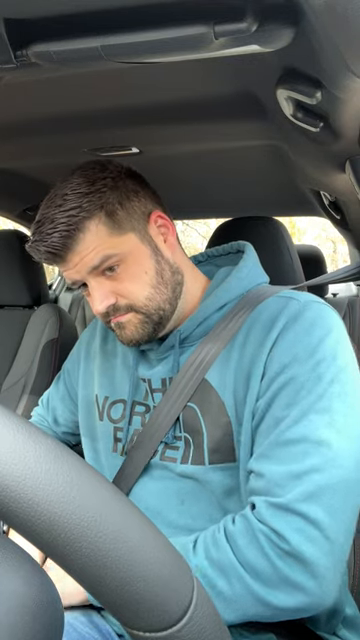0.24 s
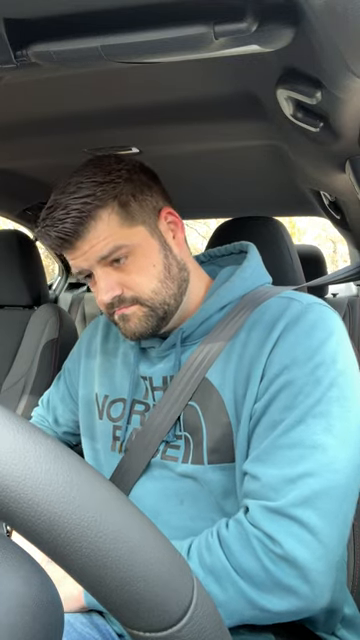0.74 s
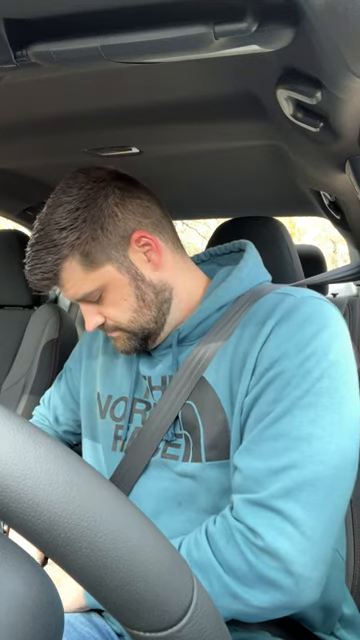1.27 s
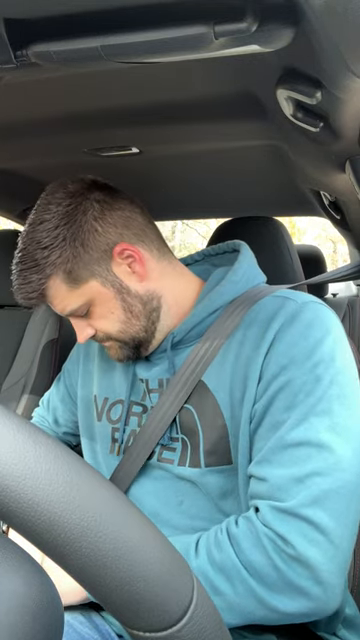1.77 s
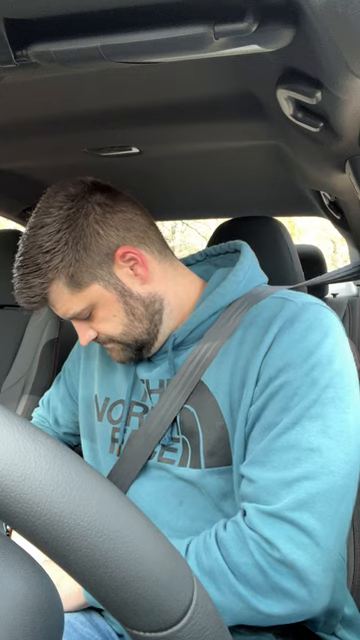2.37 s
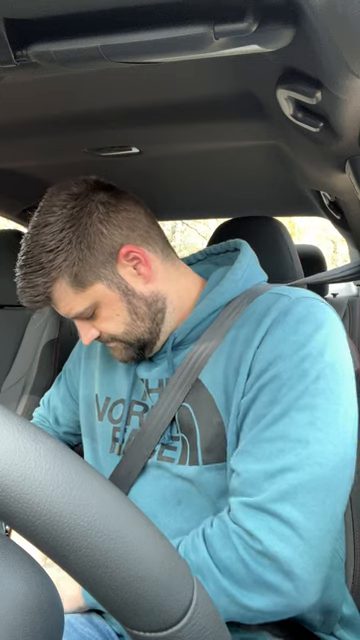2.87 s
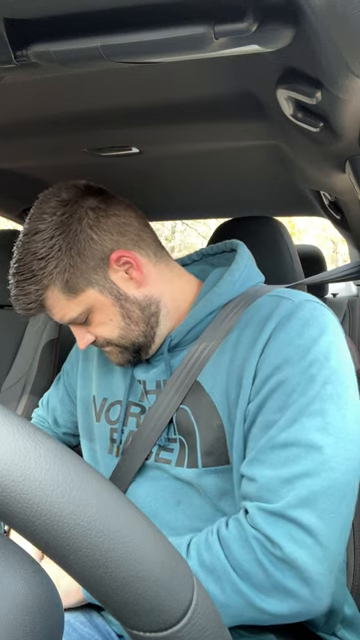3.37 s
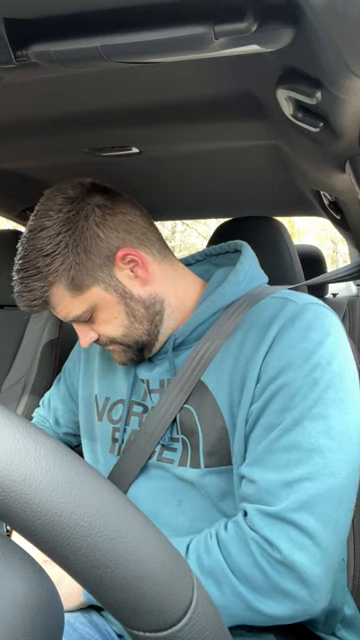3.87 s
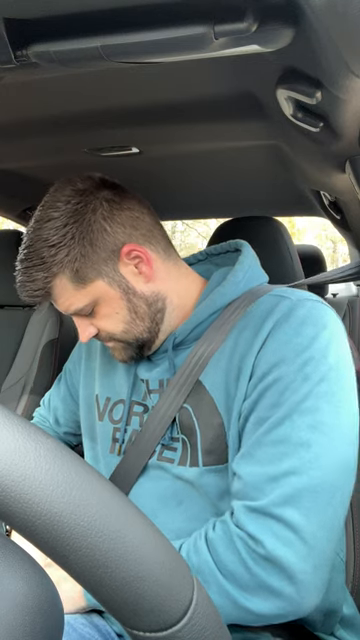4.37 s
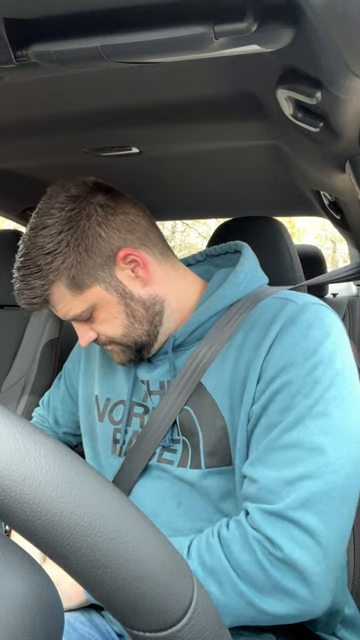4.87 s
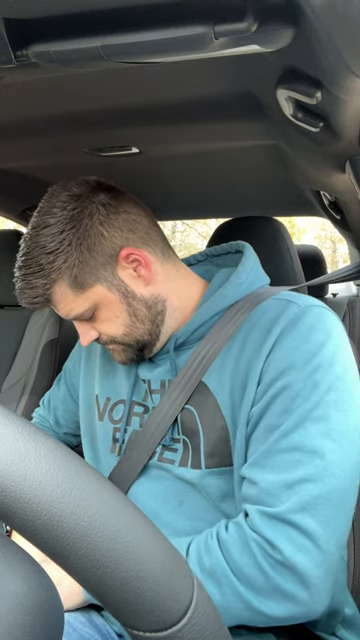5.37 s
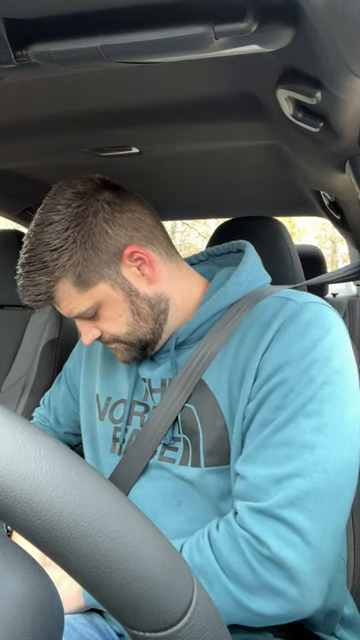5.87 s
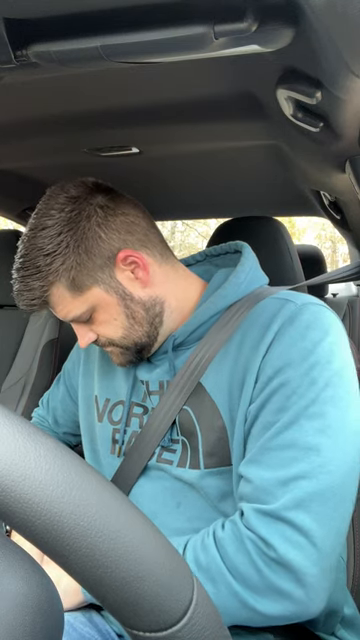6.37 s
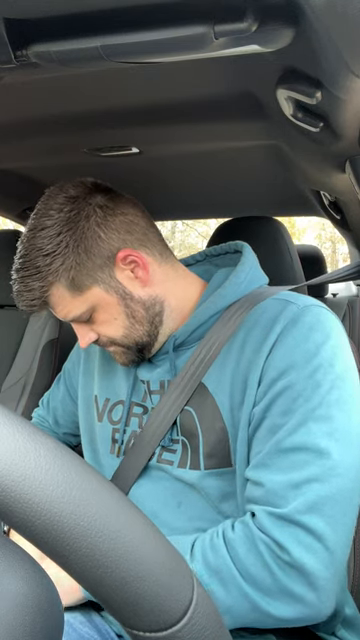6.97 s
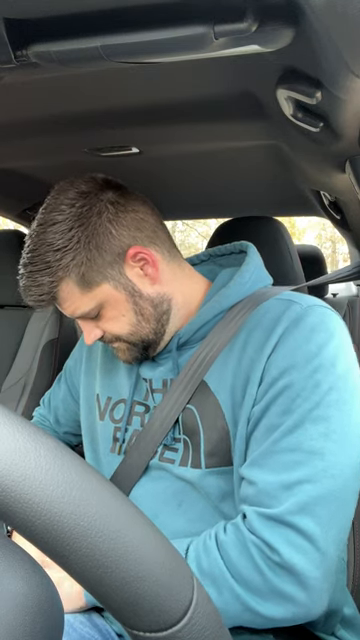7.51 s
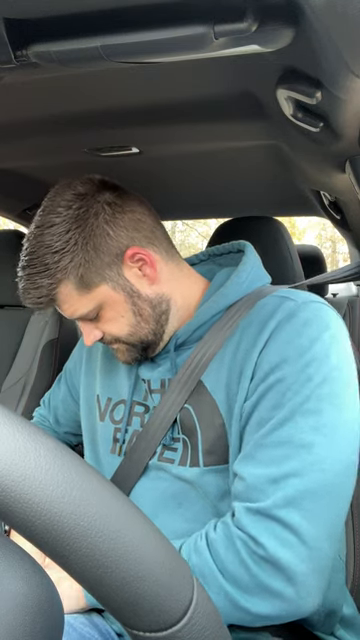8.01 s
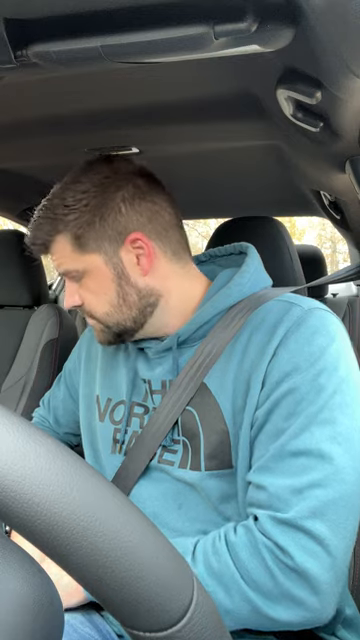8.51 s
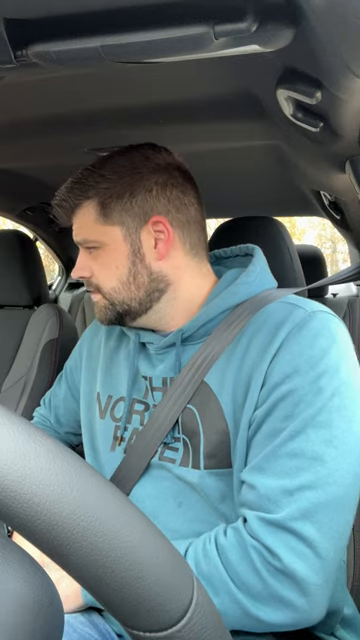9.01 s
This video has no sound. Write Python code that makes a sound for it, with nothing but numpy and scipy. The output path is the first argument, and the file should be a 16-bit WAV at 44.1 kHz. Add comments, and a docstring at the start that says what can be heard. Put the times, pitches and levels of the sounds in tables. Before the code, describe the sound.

A seat belt is clicked into its buckle and released again and again inside a quiet parked car.

```python
"""A low rumble, a faint rattle and a button's double knock open the scene; then a seat belt is latched
and released twelve times in a parked car, close to a phone. Each round: the steel tongue touches the
slot, scrapes in and is caught with a snap; a tug tests it; the button fires the spring that throws the
tongue out, then knocks back. The main blows also thump the seat, over the rumble of a shifting body
in the small, padded cabin."""
import sys
import numpy as np
from scipy import signal
from scipy.fft import rfft, irfft
from scipy.io import wavfile
from scipy.ndimage import uniform_filter1d

SR = 44100
rng = np.random.default_rng(int(sys.argv[2]) if len(sys.argv) > 2 else 0)


def digitize_waveform(pressure):
    """Quantize a signal to 16-bit integers and store it at the path in sys.argv[1].

    Rows of a 2-D input are taken as channels; values are limited to [-1, 1].
    """
    field = np.atleast_2d(pressure).T
    bounded = np.clip(field, -1, 1)
    quanta = np.round(bounded * 32767).astype(np.int16)
    wavfile.write(sys.argv[1], SR, quanta)


N = 407925
BLOCK = 8192  # samples set aside for one blow
T, HZ = np.arange(BLOCK) / SR, np.fft.rfftfreq(BLOCK, 1 / SR)  # its times and frequencies
LATCH, RELEASE, TUG, KNOCK, SCRAPE = range(5)  # the kinds of contact in the buckle

# The button springs back: t/s of the main knock, force/dB
BUTTON_RETURNS = [(0.101, -0.5), (0.9653, -1.5), (1.7635, -5.5), (2.523, 0), (3.2564, -0.5), (4.0023, -1.5),
                  (4.7476, -0.5), (5.4946, -0.5), (6.2509, 0), (6.9773, -3), (7.7388, -2.5), (8.4904, -1.5),
                  (9.2331, -1)]
# The tongue is pushed home: touch t/s, touch force/dB, scrape level/dB, snap t/s, thump level/dB,
# brightness/(dB per octave)
TONGUE_PUSHES = [(.244, 2.5, -51, .4008, -32.5, -1), (1.0968, 7, -50, 1.2602, -36, -0.5),
                 (1.8837, 6, -49.5, 2.0431, -35, -1.2), (2.708, -5, -46, 2.7748, -33, 1),
                 (3.3586, 1, -47.5, 3.517, -35, .5), (4.194, -1.5, -47, 4.2704, -38.5, -1),
                 (4.84, -2, -49.5, 4.9949, -35, -0.3), (5.585, 0.5, -47, 5.727, -32.5, -0.7),
                 (6.389, -8, -52.5, 6.4591, -32, -0.5), (7.1154, 3.5, -46, 7.264, -34, 0.6),
                 (7.848, -7, -48.5, 7.9591, -35, 0.1), (8.6013, -8.5, -47.5, 8.7303, -37.5, -1.5)]


def amp(db):
    """Turns decibels into a plain multiplier."""
    return 10 ** (np.asarray(db) / 20)


def unit_power(x):
    """Scales a signal to an average power of one."""
    return x / np.sqrt(np.mean(x ** 2) + 1e-20)


def curve(points, hz, column=0):
    """Joins the points of a table with straight lines, giving each octave equal room."""
    table = np.array(points, float)
    return np.interp(np.log(hz + 1), np.log(table[:, 0] + 1), table[:, column + 1])


def add(mix, s, sound):
    """Mixes in a sound that starts at s seconds."""
    part = mix[max(0, round(s * SR)):][:len(sound)]
    part += sound[:len(part)]


def at_level(x, db, seconds=.05):
    """Gives a blow the energy of a steady sound of this level and length."""
    return x * amp(db) * np.sqrt(seconds * SR / (np.sum(x ** 2) + 1e-20))


def ringing_filter(db):
    """A filter with these gains that rings only after it is struck."""
    log_gain = np.log(amp(np.r_[db, db[-2:0:-1]]))
    return np.exp(signal.hilbert(log_gain).conj())[:len(db)]


def noise(points):
    """Steady noise whose tone follows a table of f/Hz, level/dB."""
    gain = amp(curve(points, np.fft.rfftfreq(N, 1 / SR)))
    return unit_power(irfft(rfft(rng.standard_normal(N)) * gain, N))


def body_on_seat(upright_db=-50, leaning_db=-43.5, effort_db=7.0, recoil_db=-45, cloth_db=-55):
    """The body rumbles, more as it leans, pushes the tongue or lets the button go; cloth noise follows."""
    rumble_tone = [(22, -55), (30, -18), (48, -3.5), (72, 3), (110, -5), (160, -6), (230, -8.5),
                   (330, -15.5), (600, -28), (1500, -57.5)]  # the body shifting on the seat: f/Hz, level/dB
    cloth_tone = [(60, 1.5), (240, -6.5), (400, -16.5), (700, -10.5), (1100, -14.5), (1600, -33),
                  (2200, -20), (3200, -25), (5000, -34), (9000, -46.5), (13000, -52.5)]  # faint rustle of clothes: f/Hz, level/dB
    t = np.arange(N) / SR
    effort = sum(np.exp(-((t - snap_s + .025) / .056) ** 2) for _, _, _, snap_s, _, _ in TONGUE_PUSHES)
    recoil = sum(np.exp(-((t - s + .037) / .25) ** 2) for s, _ in BUTTON_RETURNS)
    lean = np.clip((t - 1.45) / .076 + 1, 0, 1)  # the sitter is over the buckle from 1.45 s on
    posture_db = upright_db + (leaning_db - upright_db) * lean
    rumble_db = 20 * np.log10(np.maximum(amp(posture_db), amp(recoil_db) * recoil)) + effort_db * effort
    rumble = noise(rumble_tone) * amp(rumble_db)
    return rumble + noise(cloth_tone) * amp(cloth_db + rumble_db - rumble_db.mean())


def buckle(contact, is_open, ring):
    """The buckle colours each contact and rings at its own pitches; light contacts ring less."""
    # Broad tone of each contact: f/Hz, then level/dB for latch, release, tug, knock, scrape
    tones = [(150, -13, -11, 10.5, -15, -1), (490, -0.5, 0.5, -3.5, -4, 9), (720, -9.5, -10.5, -7, -4, -4),
             (1760, -8.5, -2, 0.5, 2, 2), (2500, -9.5, -8.5, 0, -0.5, -3), (2900, -3.5, -0.5, 3, 2, 0),
             (5230, 1.5, 1, 3.5, 2, -1), (7700, -2, -8.5, 0.5, -1.5, -7.5), (8570, 1, 2, 3, 0, -6),
             (10190, -6, -6.5, -9, -2.5, -13.5), (13000, -6.5, -13.5, -6, -8, -24),
             (15500, -25, -25.5, -14.5, -23, -26)]
    # Pitches at which the buckle rings: f/Hz, width/Hz, boost when closed/dB, boost when open/dB
    resonances = [(1112, 67, 10, 8.5), (1224, 140, 6, 7.5), (2060, 280, 5.5, 10), (2253, 340, 8.5, 18),
                  (2600, 68, 15, 7.5), (3850, 160, 2, 7), (4176, 160, 6, 9), (4650, 93, 3, -3.5),
                  (4650, 73, -4.5, 9.5), (5590, 150, 3.5, 7.5), (6130, 100, 6.5, 6), (6210, 81, 5, 6),
                  (6487, 240, 13, 8.5), (6960, 180, 7, 5.5), (7216, 120, 4.5, 6), (7980, 170, 9, 5),
                  (9670, 310, 6, -3)]
    boosts = sum((opened if is_open else closed) / (1 + (2 * (HZ - hz) / width) ** 2)
                 for hz, width, closed, opened in resonances)
    return ringing_filter(curve(tones, HZ, contact) + ring * boosts)


def click(body, db, rise_s, fade_s, echo_db, tail_db, bright=0, echo_s=.0039, cabin_fade_s=.065):
    """Parts chatter, dying by 60 dB in fade_s; roof and glass echo once, and the cabin soon falls quiet."""
    def chatter(t):
        return amp(-60 * np.maximum(t, 0) / fade_s) * np.clip(t / rise_s, 0, 1)
    echo = amp(echo_db) * chatter(T - echo_s)
    tail = amp(tail_db - 60 * T / cabin_fade_s) * np.clip(T / (rise_s + echo_s), 0, 1)
    envelope = np.sqrt(chatter(T) ** 2 + echo ** 2 + tail ** 2)
    hiss, grain = rng.standard_normal((2, BLOCK))
    roughness = amp(unit_power(uniform_filter1d(grain, size=9)))  # a flicker of about 1 dB
    treble_tilt = amp(bright * np.log2(np.clip(HZ, 1500, 9000)))
    return at_level(irfft(rfft(envelope * hiss * roughness) * body * treble_tilt), db)


def tongue_rattles():
    """Now and then the loose tongue shifts in the housing with a faint click."""
    shifts = [(.005, -50.5), (0.652, -57), (.892, -60.5), (5.2372, -55.5), (7.487, -56.5)]  # small moves of the tongue: t/s, level/dB
    out, slot = np.zeros(N), buckle(SCRAPE, is_open=False, ring=.39)
    for s, db in shifts:
        add(out, s, click(slot, db, rise_s=.0026, fade_s=.073, echo_db=-3, tail_db=-8))
    return out


def scrape(body, seconds, db, grow_db, slips_per_s=70, slip_db=8.5, slip_s=.0046, grain_db=3.0):
    """One part rubs along another and rings the buckle; now and then it sticks and slips with a tick."""
    count = int(np.clip(seconds * SR, 200, BLOCK))
    hiss, grain = rng.standard_normal((2, BLOCK))
    slips = (rng.random(BLOCK) < slips_per_s / SR) * rng.exponential(1, BLOCK)
    fading_slips = signal.lfilter([1], [1, -np.exp(-1 / (SR * slip_s))], slips)
    power = 1 + amp(slip_db) ** 2 * fading_slips
    friction = (hiss * amp(grain_db * grain) * np.sqrt(power))[:count]
    stroke = amp(np.linspace(0, grow_db, count)) * signal.windows.tukey(count, .15)
    sound = signal.fftconvolve(friction * stroke, irfft(body))
    return sound * amp(db) * np.sqrt(count / np.sum(sound ** 2))


def thump(db, swell_s, fade_s, blow=11.0):
    """A push travels down the buckle's stalk, builds to one blow and shakes the padded seat."""
    resonances = [(234.5, 16.8, 5.5), (267.7, 11, -2.5), (153, 51, -9), (368, 26, -39.5),
                  (382.2, 13, -12.5), (510, 78, -23.5)]  # low pitches of the seat and stalk: f/Hz, width/Hz, level/dB
    seat = sum(amp(gain_db) * 1j * HZ * width / (hz ** 2 - HZ ** 2 + 1j * HZ * width)
               for hz, width, gain_db in resonances)
    padding = 1 / (1 + 1j * HZ / 480) ** 2  # muffles the sound above about 480 Hz
    envelope = np.clip(T / swell_s, 0, 1) * amp(-60 * np.maximum(T - swell_s, 0) / fade_s)
    shudder = rng.standard_normal(BLOCK) * envelope
    push = rfft(shudder) + blow * np.exp(-2j * np.pi * HZ * swell_s)  # the blow lands at the peak
    return at_level(irfft(push * seat * padding), db)


def button_knocks(rub_db=-53):
    """The button springs back with two knocks and rubs on its way between them."""
    # The two knocks, before the force is added: time ahead/s, click level/dB, thump level/dB
    double_knock = [(.032, -46.5, -43.5), (0.0011, -42.5, -37.5)]
    out, button = np.zeros(N), buckle(KNOCK, is_open=True, ring=.52)
    for s, force_db in BUTTON_RETURNS:
        add(out, s - .04, scrape(button, .044, rub_db + force_db, grow_db=8))
        for lead_s, db, thump_db in double_knock:
            knock = click(button, db + force_db, rise_s=.006, fade_s=.034, echo_db=-7.5, tail_db=-6)
            add(out, s - lead_s - .002, knock)
            add(out, s - lead_s + .003, thump(thump_db + force_db, swell_s=.00897, fade_s=.095))
    return out


def latching(glide_db=-56.5, snap_db=-24, spring_lead_s=.086):
    """The tongue touches the slot, glides in and scrapes against the spring; the catch snaps shut."""
    out = np.zeros(N)
    steel, slot = buckle(LATCH, is_open=False, ring=1.0), buckle(SCRAPE, is_open=False, ring=.63)
    case_tone = [(200, -15.0), (450, -1.0), (1000, -10.5), (2000, -38)]  # hollow plastic: f/Hz, level/dB
    case = ringing_filter(curve(case_tone, HZ))
    for touch_s, force_db, scrape_db, snap_s, thump_db, bright in TONGUE_PUSHES:
        touch_db, push_db = -51.5 + force_db, -38 + force_db
        slide_s, spring_s = snap_s - touch_s, max(touch_s, snap_s - spring_lead_s)
        add(out, touch_s, click(slot, touch_db, rise_s=.0013, fade_s=.05, echo_db=-2, tail_db=-4))
        add(out, touch_s, click(case, push_db - 13.5, rise_s=.0021, fade_s=.11, echo_db=-1.5, tail_db=-7))
        add(out, touch_s, thump(push_db, swell_s=.014, fade_s=.29))
        add(out, touch_s, scrape(slot, slide_s, glide_db, grow_db=7.5, slips_per_s=45, slip_db=14))
        add(out, touch_s, scrape(case, slide_s, scrape_db - 7.5, grow_db=-2))  # the case rubs in the hand
        drag = scrape(slot, snap_s - spring_s + .003, scrape_db, grow_db=-9.5, slips_per_s=90, slip_db=11)
        add(out, spring_s, drag)
        add(out, spring_s, thump(scrape_db + 7, swell_s=.02, fade_s=.19))  # the drag shakes the stalk
        snap = click(steel, snap_db, rise_s=.0004, fade_s=.051, echo_db=1.5, tail_db=-3.5, bright=bright)
        add(out, snap_s - .0008, snap)
        add(out, snap_s, thump(thump_db, swell_s=.016, fade_s=.04))
    return out


def tugging(click_db=-39):
    """The belt takes up the slack and pulls the tongue against the catch with a short, soft rattle."""
    pulls = [(0.5785, -39), (1.439, -42.5), (2.2218, -35.5), (2.9583, -40), (3.6966, -38), (4.4552, -38.5),
             (5.1666, -35.5), (5.911, -35), (6.6258, -36.5), (7.4523, -37.5), (8.1297, -39),
             (8.9135, -37.5)]  # pulls that test the belt: t/s, thump level/dB
    out, steel = np.zeros(N), buckle(TUG, is_open=False, ring=.85)
    for s, thump_db in pulls:
        add(out, s - .013, scrape(steel, .018, click_db - 1.5, grow_db=17.5))
        add(out, s, click(steel, click_db, rise_s=.0024, fade_s=.055, echo_db=0, tail_db=-4))
        add(out, s, thump(thump_db, swell_s=.01038, fade_s=.12))
    return out


def releasing(slide_db=-58.5, eject_db=-27):
    """A thumb slides the button down, the catch grinds free, the spring fires and the tongue rebounds."""
    # Button presses: thumb t/s, thumb level/dB, spring t/s, thump level/dB, brightness/(dB per octave)
    presses = [(.704, -63, .7992, -37.5, -1.7), (1.567, -56, 1.6265, -36.5, -1.5),
               (2.2837, -51.5, 2.371, -39.5, 1.2), (3.07, -58, 3.1292, -35.5, -1.1),
               (3.772, -61.5, 3.857, -32.5, 1.1), (4.569, -49.5, 4.6187, -36, -.4),
               (5.329, -59, 5.369, -32, 2), (6.037, -53.5, 6.1254, -35, -.8),
               (6.797, -57, 6.8599, -32, 1.3), (7.565, -63, 7.6, -35, 2.5),
               (8.281, -58.5, 8.3471, -35.5, 0.1), (8.995, -59, 9.0864, -37.5, -1)]
    out = np.zeros(N)
    housing, button = buckle(RELEASE, is_open=True, ring=.95), buckle(KNOCK, is_open=True, ring=.52)
    for thumb_s, thumb_db, s, thump_db, bright in presses:
        add(out, thumb_s, click(button, thumb_db, rise_s=.003, fade_s=.05, echo_db=-2, tail_db=-5))
        add(out, thumb_s, scrape(button, s - thumb_s, slide_db, grow_db=6.5, slips_per_s=50, slip_db=12))
        add(out, s - .024, scrape(housing, .026, eject_db - 15.5, grow_db=28))
        eject = click(housing, eject_db, rise_s=.0022, fade_s=.033, echo_db=-.5, tail_db=-8, bright=bright)
        add(out, s - .0012, eject)
        add(out, s + .002, thump(thump_db, swell_s=.011, fade_s=.099))
        rebound_s = s + .035 + .002 * rng.standard_normal()
        rebound = click(button, eject_db - 22.5, rise_s=.0027, fade_s=.061, echo_db=-3.5, tail_db=-4)
        add(out, rebound_s, rebound)
    return out


def scene(echo_db=-8, echo_fade_s=.04, air_db=-66):
    """Two microphones hear it all slightly out of step, each with its own faint echoes and hiss."""
    phase_leads = [(250, 0), (550, .2), (900, 1.1), (1100, .5), (1350, 2.2), (1750, 2.2), (2000, .6),
                   (2300, .4), (2600, 1.8), (3300, 1.3), (4000, -.3), (5300, .1), (8000, 1.1), (10000, 2),
                   (12400, 3.02)]  # how far the left microphone leads the right: f/Hz, phase/rad
    sound = body_on_seat() + tongue_rattles() + button_knocks() + latching() + tugging() + releasing()
    hz = np.fft.rfftfreq(N, 1 / SR)
    gap = curve(phase_leads, hz)
    direct = np.exp(.5j * np.array([gap, -gap]))
    bounces = rng.standard_normal((2, BLOCK)) * amp(-60 * T / echo_fade_s) * (T > .0015)
    echoes = rfft(bounces / np.linalg.norm(bounces, axis=1, keepdims=True), N)
    # Long waves reach both sides alike; padding swallows echoes of the shortest: f/Hz, echo share
    share = curve([(60, .03), (250, .2), (600, 1), (4500, 1), (8000, .4), (12000, .1)], hz)
    stereo = irfft(rfft(sound) * (direct + amp(echo_db) * share * echoes), N)
    air = [(100, -13.0), (700, 3.5), (2500, -6.5), (9000, -22.0), (13000, -43.5)]  # f/Hz, level/dB
    return stereo + amp(air_db) * np.array([noise(air), noise(air)])


def record(dry, cutoff_hz=15750):
    """The phone cuts off the very highest treble."""
    lowpass = signal.firwin(511, cutoff_hz, window=("kaiser", 9), fs=SR)
    return signal.oaconvolve(dry, lowpass[None], "same")


dry = scene()
out = record(dry)
digitize_waveform(out)
```